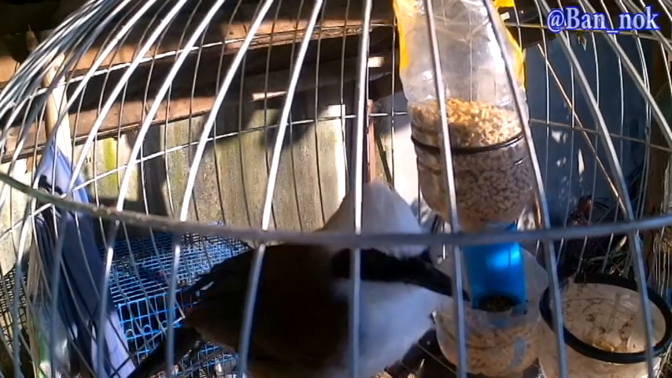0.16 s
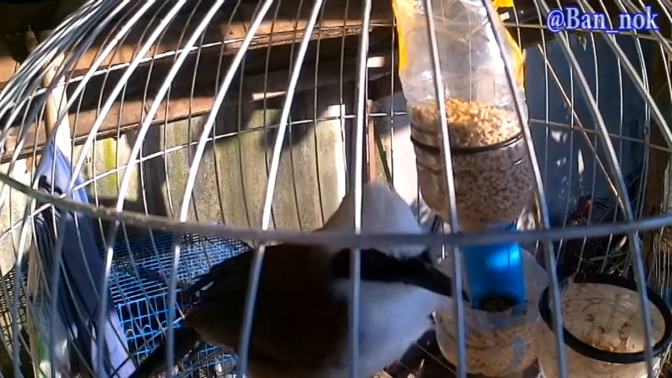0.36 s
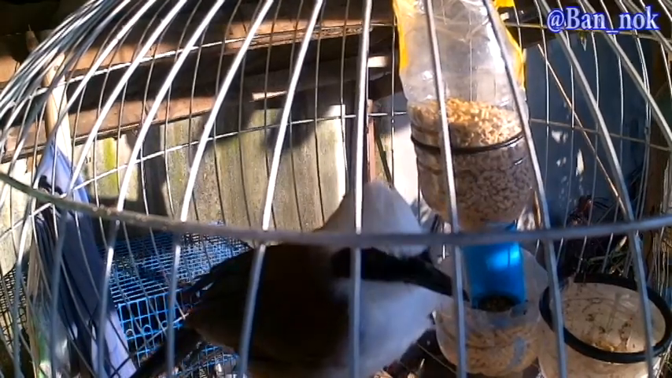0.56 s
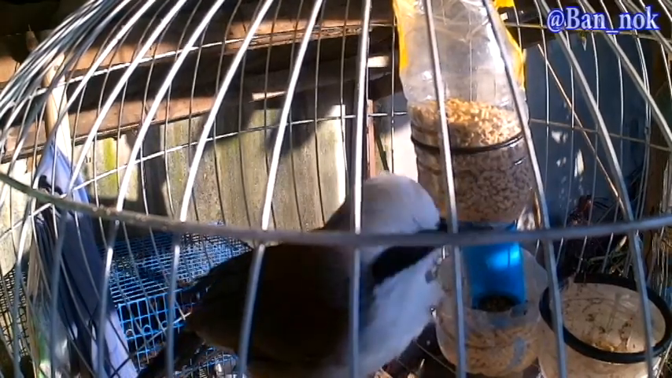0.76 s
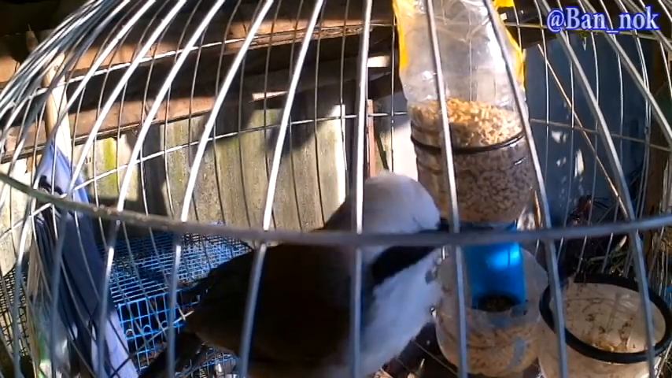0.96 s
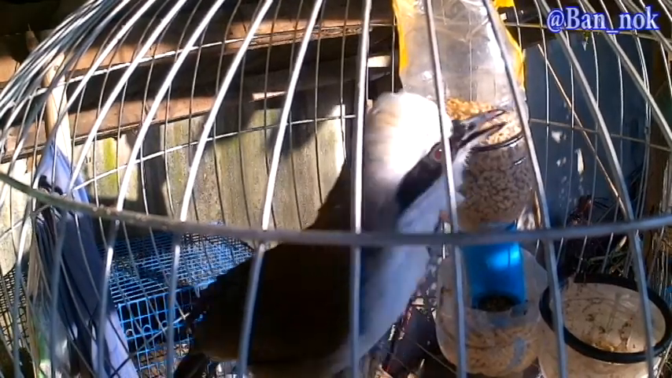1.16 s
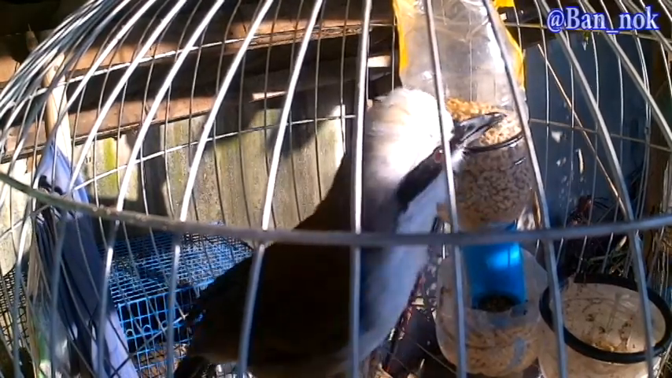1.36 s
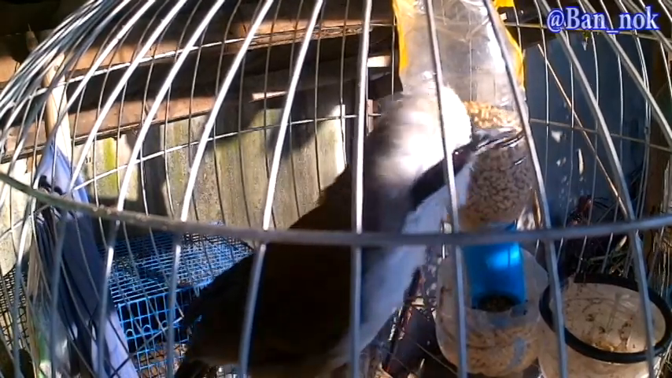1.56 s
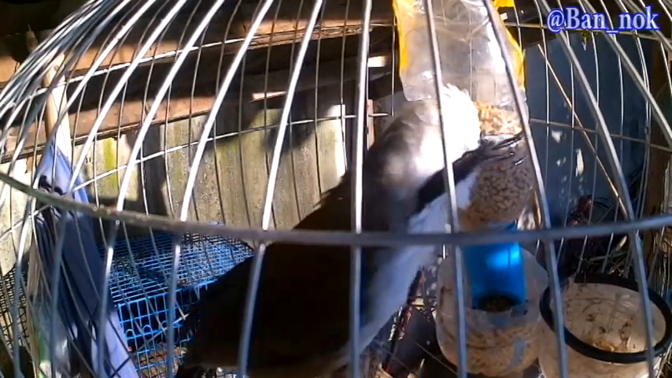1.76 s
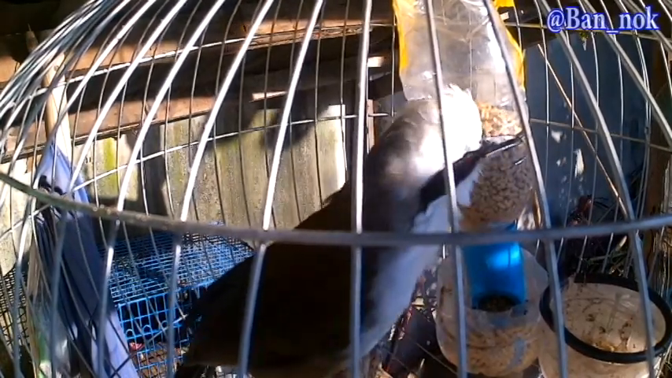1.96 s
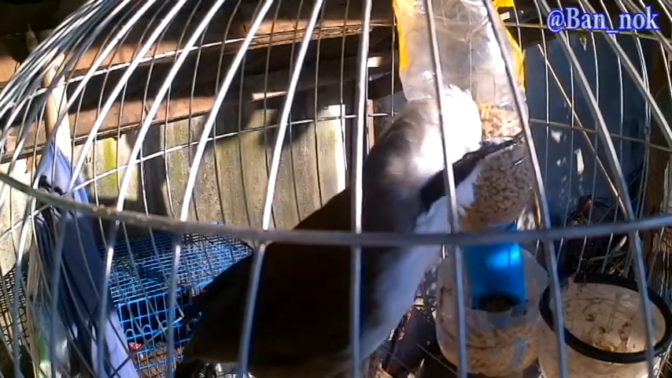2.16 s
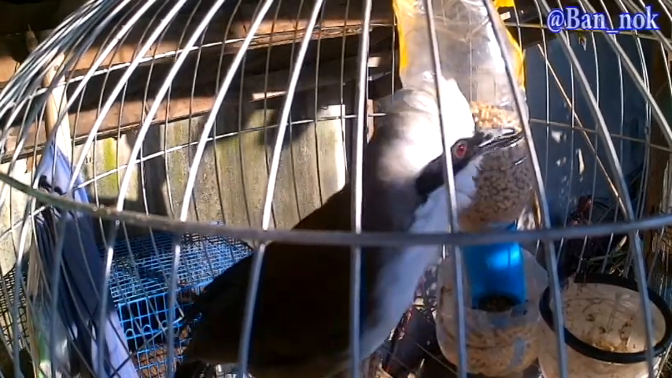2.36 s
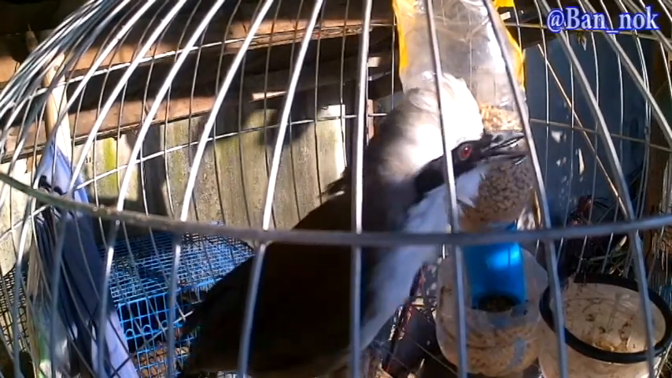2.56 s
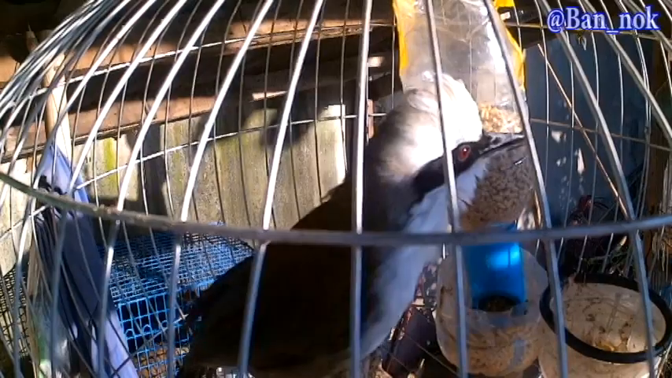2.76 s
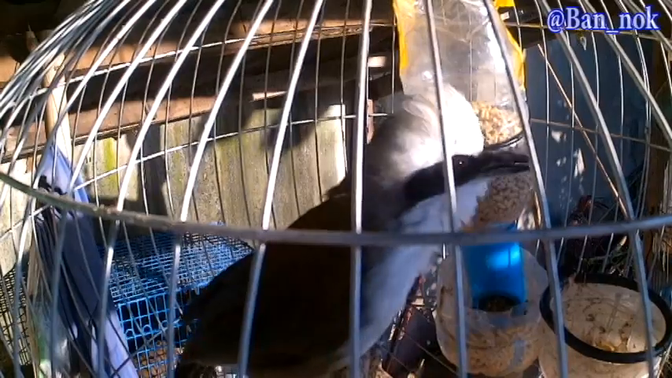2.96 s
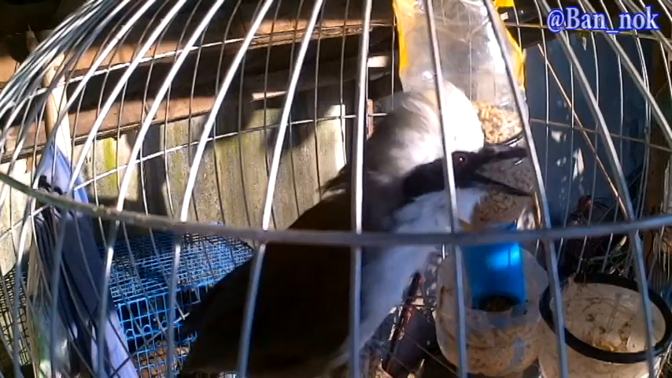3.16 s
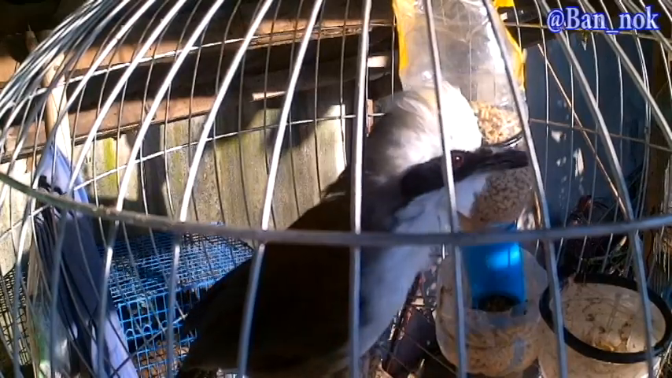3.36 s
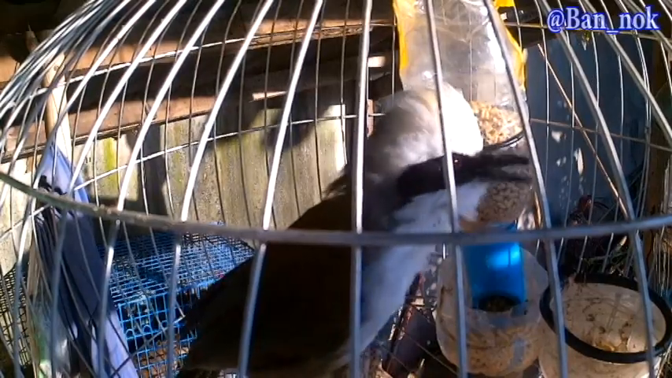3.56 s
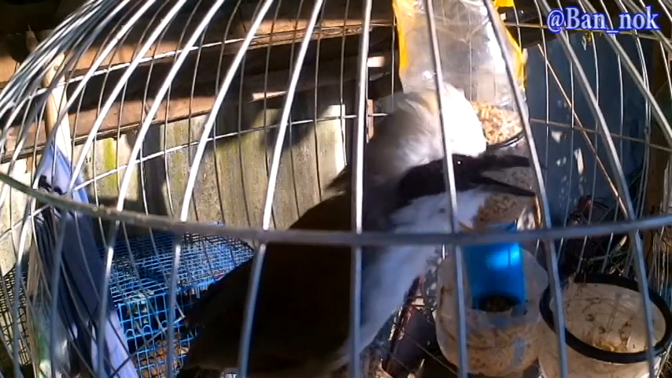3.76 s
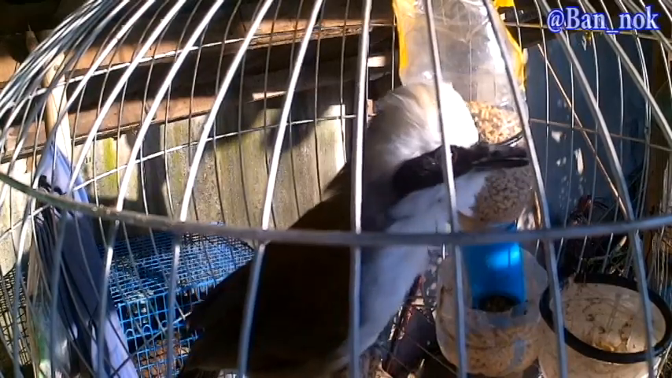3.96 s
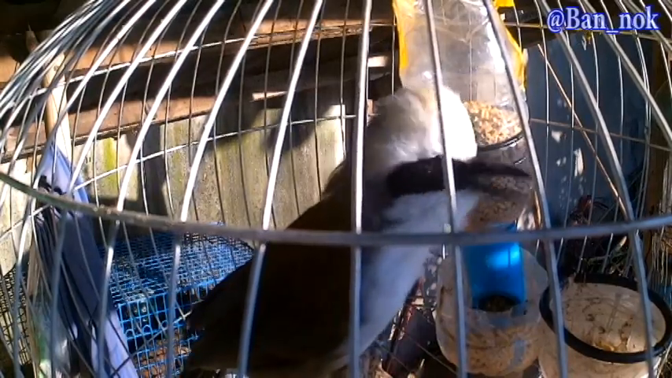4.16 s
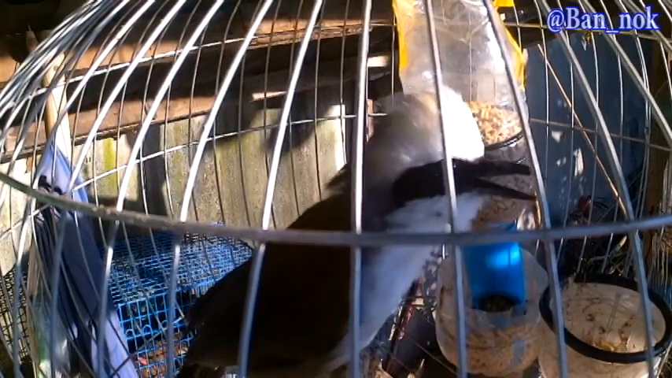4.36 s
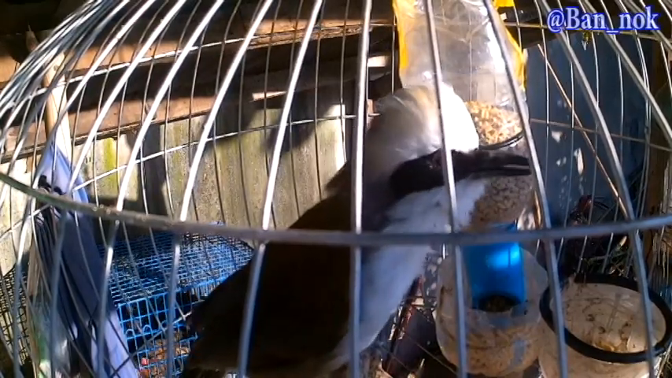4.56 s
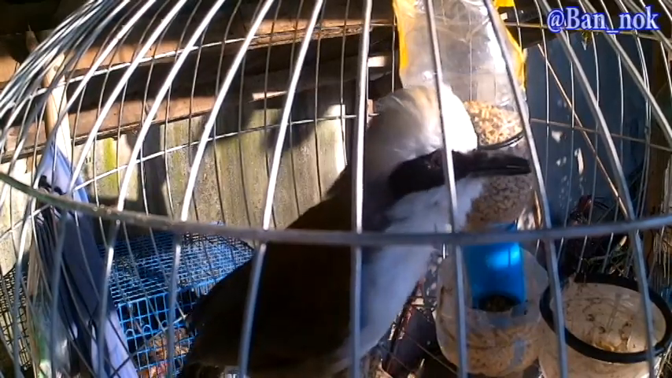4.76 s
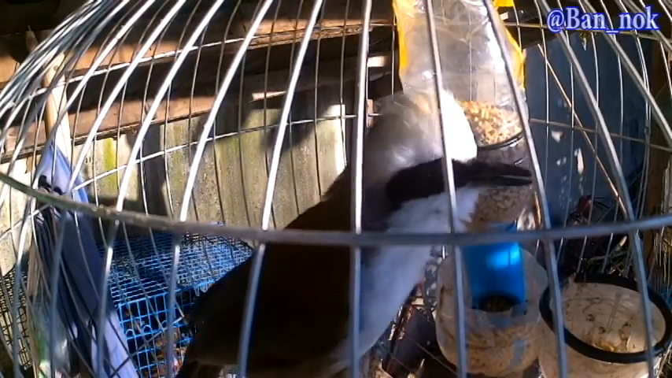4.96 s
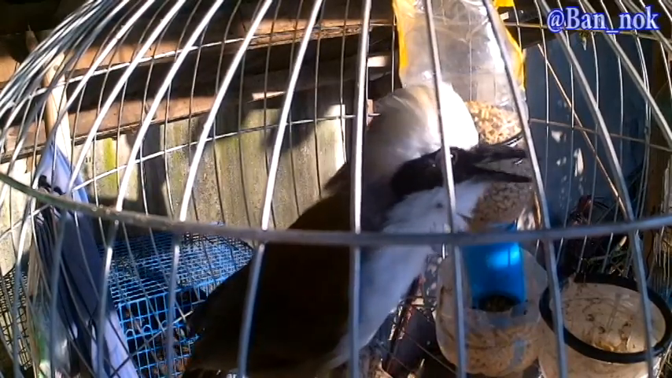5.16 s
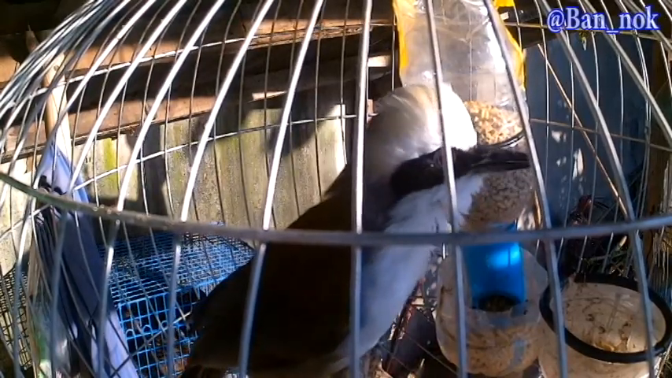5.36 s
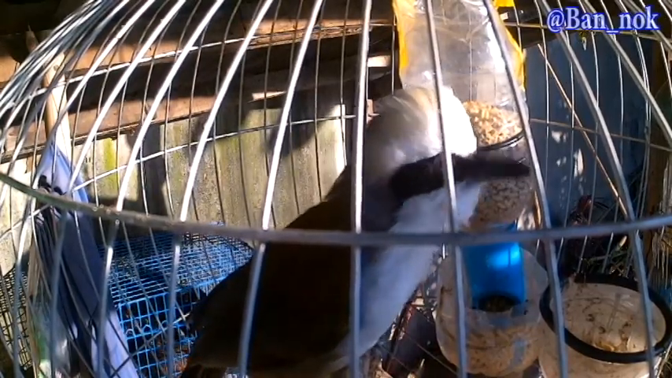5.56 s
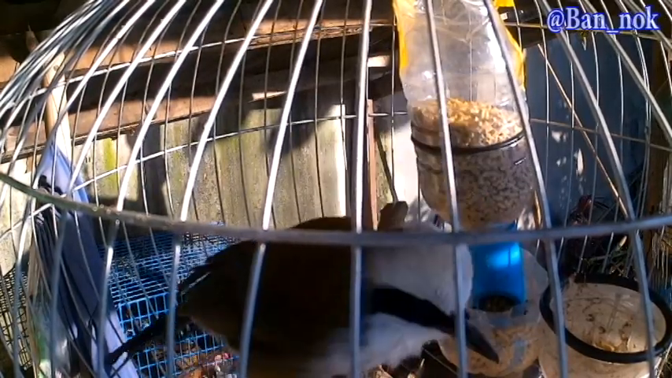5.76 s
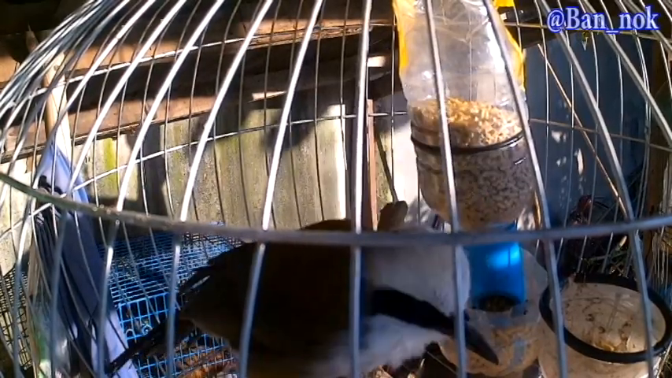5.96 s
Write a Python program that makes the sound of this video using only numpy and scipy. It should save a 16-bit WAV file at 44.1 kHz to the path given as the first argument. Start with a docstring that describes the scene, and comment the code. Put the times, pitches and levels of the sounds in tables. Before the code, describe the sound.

A caged laughingthrush close by gives a harsh squawk, then six loud rhythmic bark-and-whoop pairs in an echoing yard over a low hum.

```python
"""A laughingthrush in a wire cage outdoors, close to the microphone, over a low hum and outdoor noise. A faint
distant bird gives a thin peep before and after the laughingthrush's one harsh squawk; faint feather rustles are
scattered throughout. Three barks follow, each with a hiccup leading into a quick whoop, then three yips, each
with a full whoop. A soft low note ends the calls. Each is a harmonic syrinx tone, its throat favouring
fundamental or octave. Nearby boards and the yard echo the calls."""
import sys
import numpy as np
from scipy import signal
from scipy.fft import rfft, irfft, next_fast_len
from scipy.io import wavfile
from scipy.ndimage import uniform_filter1d, minimum_filter1d

SR = 44100
rng = np.random.default_rng(int(sys.argv[2]) if len(sys.argv) > 2 else 0)


def put_to_file(sound):
    """Save the sound as 16-bit audio at rate SR, in the file named by the first command-line argument."""
    columns = np.atleast_2d(sound).T  # one column per channel
    safe = np.clip(columns, -1, 1)
    whole_steps = np.round(safe * 32767)
    wavfile.write(sys.argv[1], SR, whole_steps.astype(np.int16))


N = 265437
TIME = np.arange(N) / SR

# Tables of calls, all levels relative:
#   contour: t/s, pitch f/Hz, fundamental level/dB, octave level/dB, overtones level/dB
#   gesture: as a contour, with share of the note/0-1 in place of t/s
#   notes: start t/s, length/s, level/dB, extra overtones level/dB, pitch factor at opening, top and end

# beak colour of the whoops' overtones, shared by hiccups and soft calls [f/Hz, relative level/dB]
WHOOP_BEAK = [(1900, 12.5), (2800, -11), (3400, -8), (3900, -9.5), (4700, -3), (5500, 7.5), (6500, -9.5),
              (7600, -21), (9500, -16.5), (11000, -19), (12500, -28), (15500, -30)]
WHOOP_VOICE = dict(jitter=.0035, slack_jitter=.013, flutter=.02, flutter_hz=220, odd_db=-6, air_db=-17)


def undb(db):
    """Decibels to gain."""
    return 10 ** (np.asarray(db) / 20)


def unit(x):
    """Scale to rms 1."""
    return x / np.sqrt(np.mean(x ** 2))


def colour(points, hz):
    """Gain at the given frequencies, interpolated in dB over log frequency."""
    f, db = np.transpose(points)
    return undb(np.interp(np.log(np.maximum(hz, 1)), np.log(f), db))


def noise(points, size):
    """Noise of rms 1 with the given spectrum."""
    spectrum = rfft(rng.standard_normal(size))
    return unit(irfft(spectrum * colour(points, np.fft.rfftfreq(size, 1 / SR)), size))


def band(hz, width_hz, size):
    """Noise of rms about 1 in a bell-shaped band; around 0 Hz it is a random wander."""
    padded = next_fast_len(size)
    bell = np.exp(-.5 * ((np.fft.rfftfreq(padded, 1 / SR) - hz) / width_hz) ** 2)
    return unit(irfft(rfft(rng.standard_normal(padded)) * bell, padded))[:size]


def syrinx(contour, beak, jitter, slack_jitter, flutter, flutter_hz, odd_db, air_db):
    """One note: a harmonic tone whose membranes flutter, with a little air noise through the beak."""
    # moments when the voice doubles its period [t/s, width/s, depth/half radians]
    doublings = [(1.121, 0.036, 0.01), (3.224, 0.0055, 0.06), (3.919, 0.0054, 0.03), (4.489, 0.0048, 0.08),
                 (5.132, 0.014, 0.01)]
    taut_hz, shimmer_db, fade_s, count = 1490, 4.0, 0.00094, 20

    contour = np.asarray(contour)
    t = TIME[(TIME >= contour[0, 0]) & (TIME <= contour[-1, 0])]
    size = len(t)
    hz, first_db, octave_db, over_db = (np.interp(t, contour[:, 0], c) for c in contour.T[1:])

    # the voice flutters while the throat rings at the octave, and is purer on the fundamental
    strain = 1 / (1 + undb(first_db - octave_db))
    # at low pitch the membranes are slack and beat unevenly; the top of a whoop is cleaner
    slack = 1 / (1 + np.exp((hz - taut_hz) / 40))
    uneven = (jitter + slack_jitter * slack) * band(0, 430, size)
    wobble = uneven + flutter * strain * band(flutter_hz, 50, size)
    phase = 2 * np.pi * np.cumsum(hz * (1 + wobble)) / SR

    # alternating long and short cycles put half tones between the harmonics
    doubling = sum(depth * np.exp(-((t - s) / width) ** 2) for s, width, depth in doublings)
    phase = phase + 2 * doubling * np.sin(phase / 2)
    tone = undb(first_db) * np.sin(phase) + undb(octave_db) * np.sin(2 * phase)

    k = np.arange(3, count + 1)[:, None]  # harmonic numbers of the overtones
    # a strong octave also weakens the odd overtones where odd_db is negative
    odd_gain = undb(odd_db * strain * (k % 2))
    gains = colour(beak, k * hz) * odd_gain * (k * hz < SR / 2)
    # the shape of the pulses shifts, so each overtone swells and fades by itself
    gains = gains * undb(shimmer_db * np.array([band(0, 38, size) for _ in k]))
    overtones = (gains * np.sin(k * phase)).sum(0) / np.sqrt((gains ** 2).sum(0) / 2)

    hiss = noise([(300, -22.5)] + list(beak), size)
    air = undb(air_db) * (0.83 + slack) * hiss * (1 + np.cos(phase))  # puffs once a cycle
    fade = np.clip(np.minimum(t - t[0], t[-1] - t) / fade_s, 0, 1)
    note = fade * (tone + undb(over_db) * (overtones + air))
    start = np.searchsorted(TIME, t[0])
    return np.pad(note, (start, N - start - size))


def perform(gesture, note, notch_db, count=200):
    """Stretch a gesture to one note and bend its pitch into a contour, coloured by one reflection."""
    notch_hz, notch_width_hz = 1545, 28
    start, length, db, bright_db, *bend = note
    stage, *controls = np.transpose(gesture)
    share = np.linspace(0, 1, count)
    hz, first_db, octave_db, over_db = (np.interp(share, stage, c) for c in controls)
    hz = hz * np.interp(share, [0, share[hz.argmax()], 1], bend)
    # negative notch_db cancels part of the fundamental near this pitch, positive reinforces it
    notch = notch_db * np.exp(-((hz - notch_hz) / notch_width_hz) ** 2)
    levels = [db + first_db + notch, db + octave_db, db + over_db + bright_db]
    return np.transpose([start + length * share, hz, *levels])


def calls(gesture, notes, beak, notch_db=0, **voice):
    """All notes of one kind, sung with the same gesture and voice."""
    return sum(syrinx(perform(gesture, note, notch_db), beak, **voice) for note in notes)


def squawk():
    """The harsh opening call: strong flutter over three swells of pitch, mostly at the octave."""
    # contour, before a lift of 2 dB [t/s, pitch f/Hz, fundamental, octave, overtones level/dB]
    contour = [(1.003, 592, -32, -45, -55), (1.019, 565, -36, -29.5, -61), (1.039, 638, -25, -24.5, -42),
               (1.061, 647, -25, -25.5, -43.5), (1.081, 707, -21.5, -22.5, -40.5),
               (1.095, 844, -23, -15, -34.5), (1.111, 903, -23.5, -10, -25.5), (1.131, 852, -27, -7.5, -29),
               (1.157, 605, -28.5, -13, -41.5), (1.171, 795, -25.5, -13, -36.5),
               (1.173, 798, -25, -14.5, -34.5), (1.191, 643, -27, -10, -28),
               (1.203, 792, -24.5, -15, -44.5), (1.211, 844.5, -21.5, -6.5, -27.5),
               (1.251, 769, -29, -11.5, -36.5), (1.263, 655.5, -26.5, -14, -28),
               (1.275, 440.9, -40.5, -22, -48), (1.288, 394, -66, -44.5, -52.5)]
    # beak colour of the overtones [f/Hz, relative level/dB]
    beak = [(1900, 17), (2750, -5.5), (3500, -0.5), (4400, -13.5), (5200, -17.5), (6600, 1.5), (7400, -3),
            (8400, -13.5), (9200, -27), (11500, -15.5), (15500, -30)]
    return undb(2) * syrinx(contour, beak, jitter=.008, slack_jitter=.01, flutter=.023,
                            flutter_hz=300, odd_db=-8, air_db=-17)


def barks():
    """Sharp notes that ring at the octave, climb and plunge."""
    # gesture [share/0-1, pitch f/Hz, fundamental, octave, overtones level/dB]
    gesture = [(0, 785, -39, -50.5, -84), (.1, 1051, -21.5, -21.5, -41), (.22, 1031, -35, -6.5, -32),
               (.42, 1143, -35.5, -13.5, -20.5), (.6, 1231, -31, -11.5, -24),
               (.72, 1187, -34.5, -10.5, -24), (.79, 956, -26.5, -5.5, -25.5),
               (.86, 639, -23.5, -17, -33.5), (.94, 444, -40, -21.5, -45), (1, 368, -63, -39, -50)]
    # notes [t/s, length/s, level/dB, extra overtones level/dB, pitch factor at opening, top, end]
    notes = [(1.481, .091, 2.2, -2.5, 1.03, .94, 1.06), (2.19, 0.11, -2.06, 0, 1.01, 1.012, .975),
             (2.844, 0.11, -2, 2, .965, 1.065, 1.03)]
    # beak colour of the overtones [f/Hz, relative level/dB]
    beak = [(1900, 7), (2900, -34), (3500, 11.5), (3950, -15.5), (4600, 4.5), (5100, -5), (5900, -11.5),
            (7400, -3.5), (8400, -13), (9300, -24), (12500, -28.5), (15500, -40)]
    return calls(gesture, notes, beak, jitter=.004, slack_jitter=.003, flutter=.017,
                 flutter_hz=220, odd_db=-7, air_db=-20)


def hiccups():
    """Lead-ins that sag and crack to a low pitch; the voice catches on the octave as the first opens."""
    # contour of the catch [t/s, pitch f/Hz, fundamental, octave, overtones level/dB]
    catch = [(1.688, 892, -68, -37.5, -71), (1.697, 835, -66, -17.5, -50), (1.701, 830, -62.5, -30, -52)]
    # gesture [share/0-1, pitch f/Hz, fundamental, octave, overtones level/dB]
    gesture = [(0, 1253, -41.5, -66.5, -76), (.17, 1275, -14.5, -45, -48.5),
               (.35, 1226, -11.5, -58.5, -34.5), (.64, 1137, -7.5, -40, -33), (.76, 849, -12, -20, -36.5),
               (.85, 520, -27.5, -12.5, -47), (.96, 587, -32.5, -15, -53), (1, 600, -47, -18, -53)]
    # notes [t/s, length/s, level/dB, extra overtones level/dB, pitch factor at opening, top, end]
    notes = [(1.692, 0.047, 1.5, -6, .92, 0.89, 1.03), (2.403, 0.064, -1, -2, 1.08, 1.017, 0.98),
             (3.056, .062, -0.4, -1.5, 1.005, .998, .99)]
    return syrinx(catch, WHOOP_BEAK, **WHOOP_VOICE) + calls(gesture, notes, WHOOP_BEAK, **WHOOP_VOICE)


def quick_whoops():
    """Whoops on the fundamental that leap into an arch and sink slowly, slightly reinforced by a reflection."""
    # gesture [share/0-1, pitch f/Hz, fundamental, octave, overtones level/dB]
    gesture = [(0, 1196, -30, -41, -56), (.03, 1321, -11.5, -47, -47), (.07, 1361, -5.5, -39.5, -33.5),
               (.17, 1462, -13, -57, -35), (.27, 1647, -7.5, -35.5, -38.5), (.37, 1639, -8.5, -41.5, -38),
               (.56, 1495, -9, -52.5, -39.5), (.86, 1407, -11, -50, -35.5), (.93, 1353, -25.5, -47, -60),
               (1, 813, -35.5, -58, -67)]
    # notes [t/s, length/s, level/dB, extra overtones level/dB, pitch factor at opening, top, end]
    notes = [(1.749, 0.18, -0.4, -2.5, 0.99, 1.022, .94), (2.465, 0.19, -.5, -.5, 1.02, 1.007, 1.006),
             (3.115, 0.19, .8, 2.5, .995, .998, .99)]
    return calls(gesture, notes, WHOOP_BEAK, notch_db=1.5, **WHOOP_VOICE)


def yips():
    """Sharp notes that climb at the octave, flip to the fundamental and fall."""
    # gesture [share/0-1, pitch f/Hz, fundamental, octave, overtones level/dB]
    gesture = [(0, 713, -32.5, -37.5, -82), (.09, 843, -43, -20.5, -33), (.135, 1054, -22.5, -14, -28.5),
               (.22, 1081, -49, -11, -22), (.42, 1214, -34, -13.5, -28), (.47, 1465, -13, -41, -24.5),
               (.6, 1316, -11.5, -24.5, -37), (.75, 1075, -10, -26.5, -32), (.82, 665, -17, -10, -33),
               (.91, 448.5, -30.5, -11, -44), (1, 357, -49.5, -59.5, -57)]
    # notes [t/s, length/s, level/dB, extra overtones level/dB, pitch factor at opening, top, end]
    notes = [(3.519, .094, 0, -0.5, .98, 1.03, 1.04), (4.138, 0.089, -0.6, .5, 1.015, 1.01, 0.99),
             (4.804, 0.087, -1, 0.5, 1.02, .98, 1.005)]
    # beak colour of the overtones [f/Hz, relative level/dB]
    beak = [(1900, 20), (2900, -18), (3600, 3), (4300, -5), (4800, 1.5), (5400, 14), (6100, -4.5),
            (7200, 2.5), (8300, -6.5), (9700, -19), (11000, -11.5), (13000, -21.5), (15500, -34.5)]
    return calls(gesture, notes, beak, jitter=.003, slack_jitter=.003, flutter=.007,
                 flutter_hz=220, odd_db=-5, air_db=-21)


def full_whoops():
    """Whoops that scoop up into a long arch and drop off, partly cancelled by a reflection."""
    # gesture [share/0-1, pitch f/Hz, fundamental, octave, overtones level/dB]
    gesture = [(0, 1116, -31, -62, -68), (.05, 888.7, -8.5, -19.5, -45), (.09, 970.3, -9.5, -38.5, -41.5),
               (.15, 1337, -8.5, -46.5, -32), (.3, 1550, -7.5, -49, -38.5), (.42, 1617, -4.5, -39, -35),
               (.6, 1526, -7, -45, -34), (.75, 1450, -8, -53, -37.5), (.81, 1421, -9, -52, -37.5),
               (.895, 1375, -8.5, -38, -25.5), (.94, 1290, -22, -48, -51.5), (1, 605, -33, -36, -69)]
    # notes [t/s, length/s, level/dB, extra overtones level/dB, pitch factor at opening, top, end]
    notes = [(3.725, .23, .5, 0, 1.017, 1.01, 1.026), (4.336, 0.23, 0.14, 2, 1.027, 1.004, 0.99),
             (5.006, .231, -0.5, 1.5, .99, .993, .975)]
    return calls(gesture, notes, WHOOP_BEAK, notch_db=-4.0, **WHOOP_VOICE)


def soft_calls():
    """Two thin arched peeps from a faint distant bird, and a soft low note, unsteady in pitch and breathy."""
    # gesture of a peep [share/0-1, pitch f/Hz, fundamental, octave, overtones level/dB]
    peep = [(0, 4870, -60, -90, -88.5), (.36, 5880, -55.5, -88.5, -83), (.74, 5970, -45, -89, -83),
            (1, 4900, -62, -90, -85.5)]
    # peeps [t/s, length/s, level/dB, extra overtones level/dB, pitch factor at opening, top, end]
    peeps = [(0.388, .07, -12, 0, 1, 1.005, 1.1), (1.404, 0.043, -2, 3, 1.005, 1.005, 1.005)]
    # contour of the low note [t/s, pitch f/Hz, fundamental, octave, overtones level/dB]
    low_note = [(5.35, 851, -37, -79, -79), (5.365, 875, -47, -70, -76), (5.42, 893, -43.5, -69.5, -61),
                (5.44, 829.5, -64.5, -77.5, -77)]
    voice = dict(jitter=.018, slack_jitter=.025, flutter=0, flutter_hz=220, odd_db=0, air_db=-10)
    return calls(peep, peeps, WHOOP_BEAK, **voice) + syrinx(low_note, WHOOP_BEAK, **voice)


def yard(x, near_db, near_t60_s, far_db, far_t60_s, build_s):
    """Distinct echoes, dense scatter from things around the cage, and a faint longer tail."""
    # scatter close to the cage, bright because the beak points away from the microphone
    # [f/Hz, relative level/dB]
    scatter = [(200, -23.5), (600, 0.5), (1100, 0.5), (1600, 1), (2400, 6.5), (3500, 1), (6000, 1),
               (10000, 7.5), (16000, -6)]
    # colour of the yard's reverberation [f/Hz, relative level/dB]
    far_colour = [(200, -7), (700, 3), (1500, -0.5), (2100, -9), (2550, 8), (3200, -7.5), (4600, -9),
                  (5600, -3), (7500, -13), (16000, -12.5)]
    # echoes from the feeder, floor and fence [delay t/ms, level/dB]
    reflections = [(4.2, -19.5), (10.5, -13), (16.5, -24), (22, -33.5)]
    t = TIME[:SR]
    response = np.zeros(SR)
    for points, db, t60_s in ((scatter, near_db, near_t60_s), (far_colour, far_db, far_t60_s)):
        decay = np.exp(-np.log(1000) * t / t60_s)
        build = 1 - np.exp(-(t / build_s) ** 2)
        tail = noise(points, SR) * decay * build
        response += undb(db) * unit(tail) / np.sqrt(SR)
    for ms, db in reflections:
        response[int(ms * SR / 1000)] += undb(db)
    return signal.fftconvolve(x, response)[:N]


def rustles():
    """Feathers rustling near the microphone: short swells of soft band-limited hiss."""
    # swells [centre t/s, width/s, centre f/Hz, peak level/dB]
    swells = [(.03, .08, 4280, -58.5), (0.443, 0.097, 4980, -62), (0.915, 0.064, 3880, -58),
              (1.034, 0.051, 4000, -51), (1.467, 0.02, 5570, -55), (2.16, 0.052, 4280, -59),
              (4.322, 0.055, 4300, -53), (4.743, 0.049, 4430, -59.5), (5.414, 0.023, 4000, -56)]
    total = 0
    for s, width, hz, db in swells:
        swell = np.exp(-2 * ((TIME - s) / width) ** 2)
        total = total + undb(db) * swell * band(hz, 1070, N)
    return total


def background():
    """Steady outdoor noise, a hum of wandering pitch and the faint narrow-band whir of a distant machine."""
    # outdoor noise colour [f/Hz, relative level/dB]
    outdoors = [(22, -2), (40, 6), (70, -1.5), (105, -4), (160, -7.5), (330, -5), (600, -10), (1000, -15),
                (1250, -22), (1800, -19), (2200, -26.5), (5000, -32), (15500, -35)]
    # hum tones [f/Hz, rms level/dB]
    hum_tones = [(59.3, -50), (119, -63.5)]
    # distant whir [f/Hz, width f/Hz, rms level/dB]
    whir_bands = [(1607.6, 55, -63.5), (1760, 39, -63.5), (1850, 13, -65)]
    total = undb(-46.5) * noise(outdoors, N)
    for hz, db in hum_tones:
        wandering_hz = hz + 1.8 * band(0, 2.27, N)
        total = total + undb(db) * unit(np.sin(2 * np.pi * np.cumsum(wandering_hz) / SR))
    for hz, width_hz, db in whir_bands:
        total = total + undb(db) * band(hz, width_hz, N)
    return total


def scene():
    """The birds, their echoes, the rustles and the background."""
    pairs = barks() + hiccups() + quick_whoops() + yips() + full_whoops()
    bird = squawk() + pairs + soft_calls()
    echoes = yard(bird, near_db=-8, near_t60_s=0.1, far_db=-26.5, far_t60_s=0.46, build_s=0.0037)
    return (bird + echoes + rustles() + background())[None]


def record(dry):
    """The recorder's limiter holds down the loudest peaks, and the top is cut."""
    ceiling_db, limiter_s, top_hz = -1.2, .004, 15800
    size = int(limiter_s * SR)
    gain = undb(ceiling_db) / np.maximum(np.abs(dry), undb(ceiling_db))
    # hold the lowest gain around each peak, then smooth it
    limited = dry * uniform_filter1d(minimum_filter1d(gain, size), size)
    low_pass = signal.ellip(10, .1, 80, top_hz, fs=SR, output="sos")
    return signal.sosfilt(low_pass, limited)


dry = scene()
out = record(dry)
put_to_file(out)
```